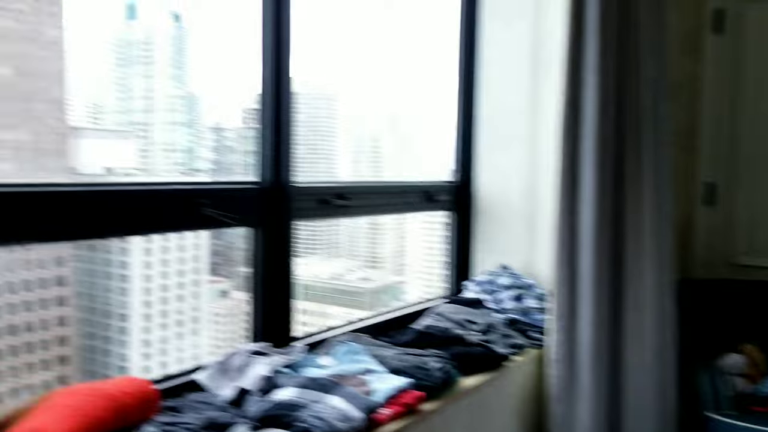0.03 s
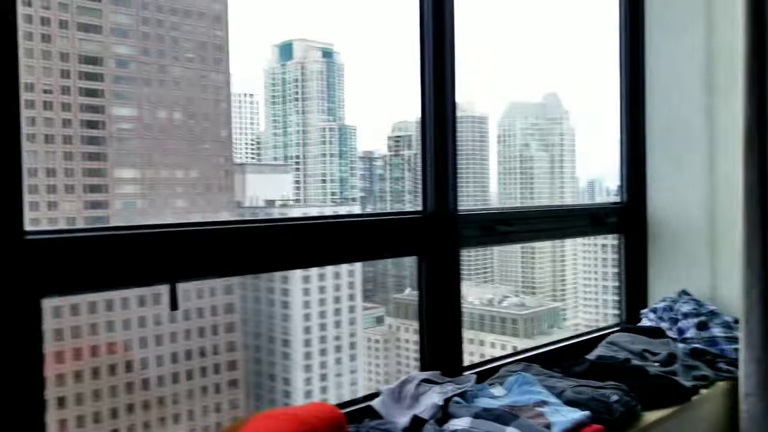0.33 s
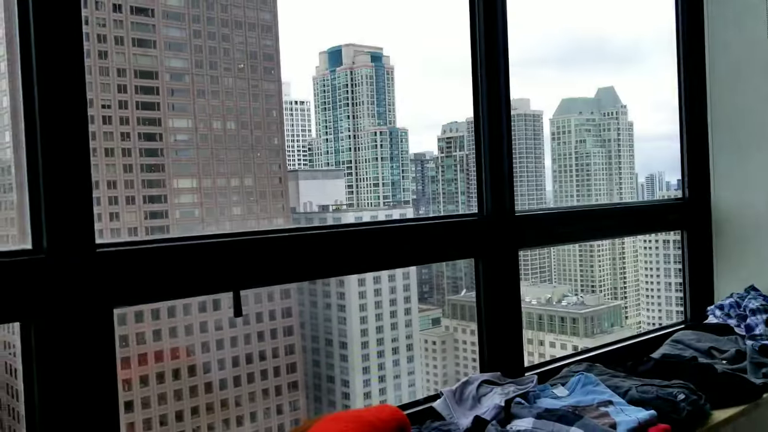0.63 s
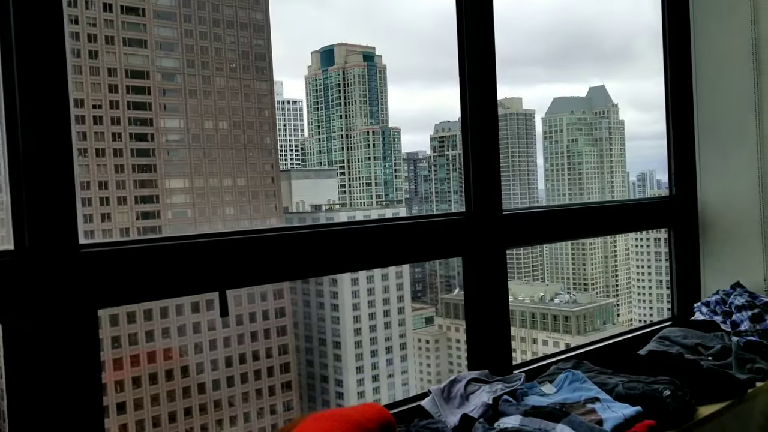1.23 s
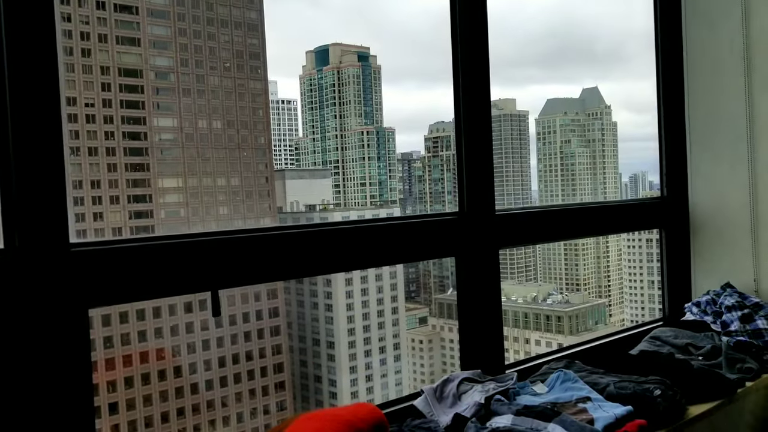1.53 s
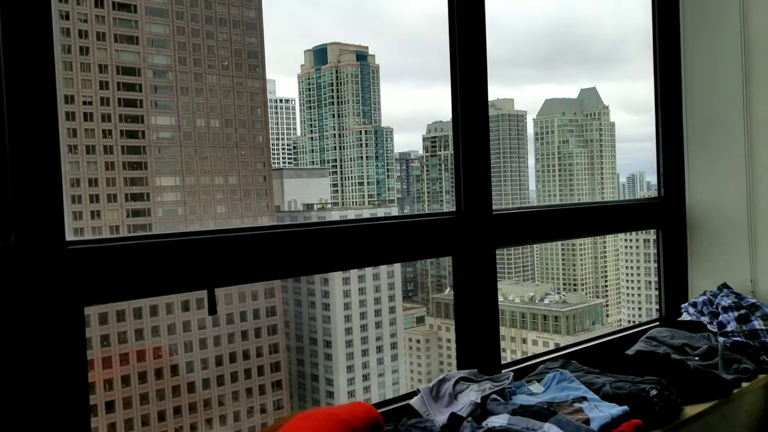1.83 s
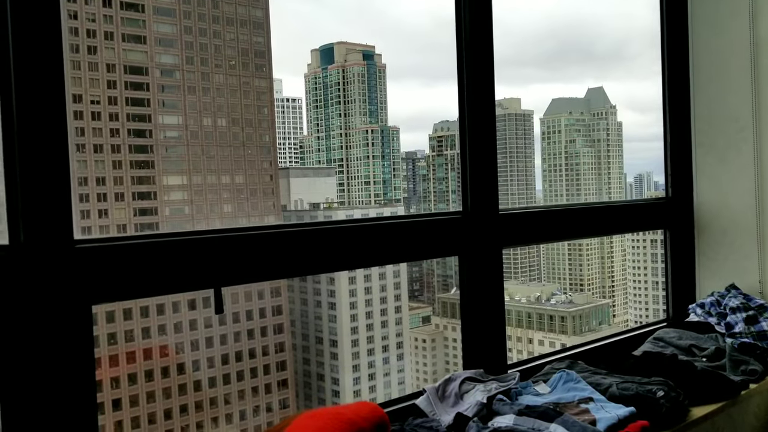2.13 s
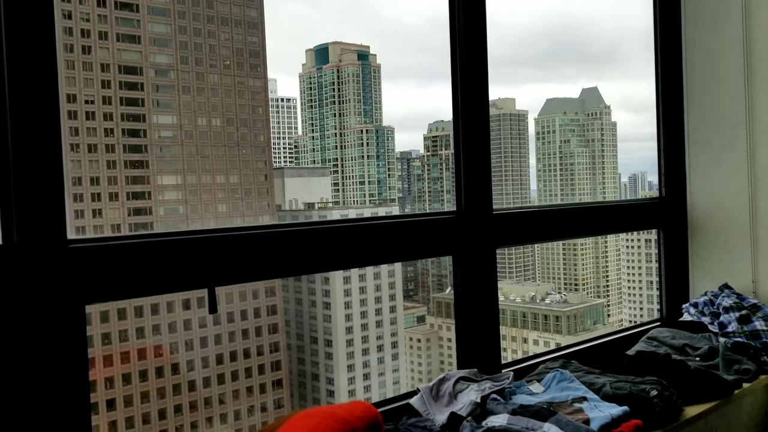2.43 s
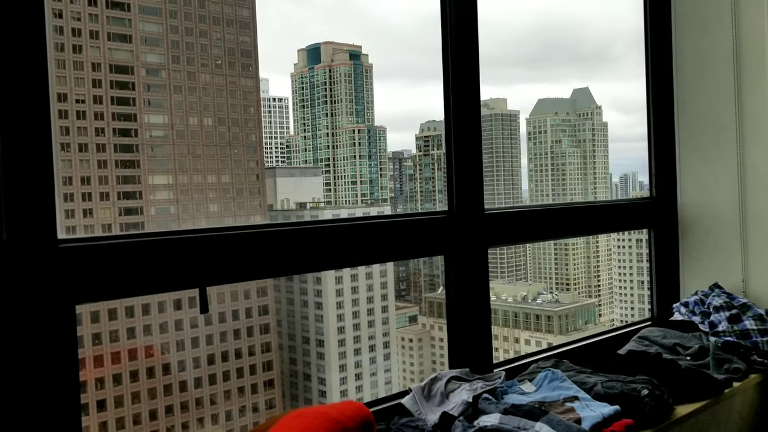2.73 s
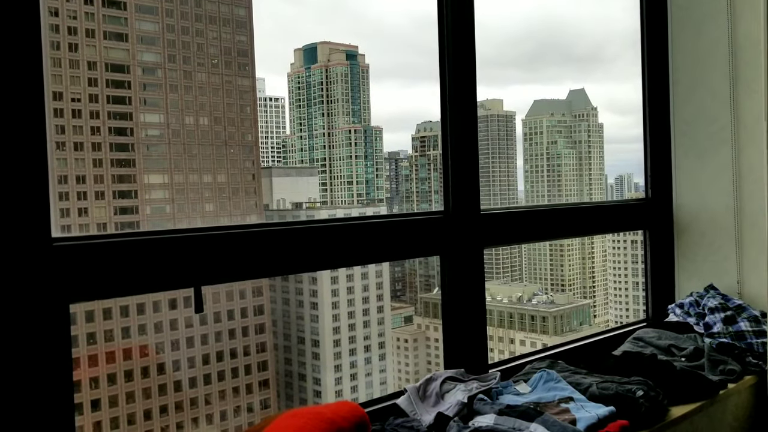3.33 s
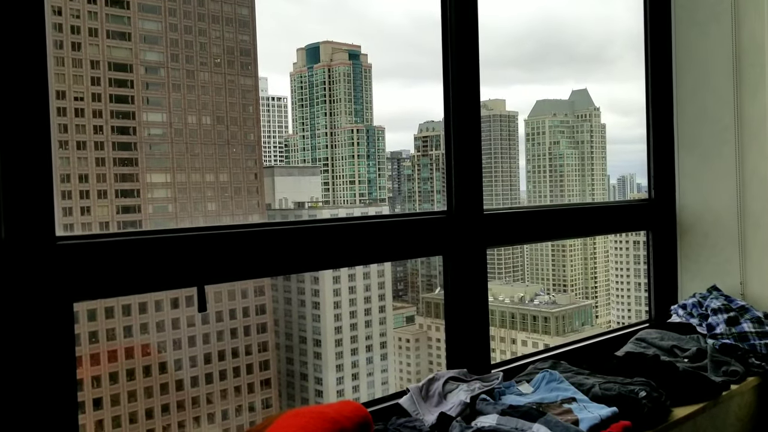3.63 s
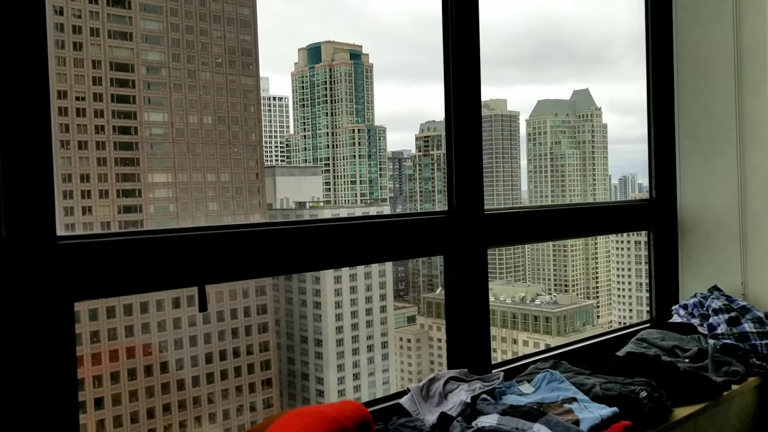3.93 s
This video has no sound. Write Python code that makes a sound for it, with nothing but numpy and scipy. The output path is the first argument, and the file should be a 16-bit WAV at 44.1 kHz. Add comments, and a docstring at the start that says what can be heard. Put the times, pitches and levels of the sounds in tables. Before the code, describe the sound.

Wind rushes dully against the window of a high room, with a thin wavering whistle and a low moan. The whistle gives way to a creak from the frame, which slows to single knocks over faint microphone hiss.

```python
"""A dull rush, a thin whistle and a low moan: wind leans on the window of a high room.
The gap whistles and moans; the pane drones. Under the load the frame sticks and slips,
creaking for two seconds in a run of like slips that slows to single knocks.
The room rings with each slip; a faint hum and microphone hiss lie underneath."""
import sys
import numpy as np
from scipy import signal
from scipy.fft import rfft, irfft
from scipy.io import wavfile
from scipy.ndimage import uniform_filter1d

SR = 44100
rng = np.random.default_rng(int(sys.argv[2]) if len(sys.argv) > 2 else 0)


def transcribe(u):
    """Save the signal u as a 16-bit wav file named by the first command-line argument.

    u: samples, shape (n,) or (channels, n), limited to [-1, 1]; the rate is SR.
    q: integer samples, one column per channel.
    """
    v = np.clip(np.atleast_2d(u).T, -1, 1)
    q = np.round(v * 32767).astype(np.int16)
    wavfile.write(sys.argv[1], SR, q)


N = 176400
T = np.arange(N) / SR

# Wind levels. Each row: time in seconds, level in dB.
RUSH_LEVEL_DB = [(0, -48.5), (.3, -48), (.5, -47), (.56, -50), (1.1, -49), (1.45, -55), (1.72, -46.5),
                 (2.0, -48.5), (2.6, -49), (3.1, -49), (3.55, -50), (4, -49.5)]
MOAN_LEVEL_DB = [(.08, -66), (.28, -57.5), (.38, -48), (.5, -45.5), (.56, -79), (.78, -66), (.87, -46.5),
                 (.93, -64), (1.02, -46.5), (1.11, -61), (1.2, -50.5), (1.3, -56), (1.54, -44),
                 (1.77, -50.5), (1.88, -52.5), (2.0, -61), (2.12, -51), (2.23, -66.5), (2.52, -50),
                 (2.9, -60.5), (3.08, -59), (3.19, -48), (3.3, -61.5), (3.45, -65), (3.63, -46.5),
                 (3.75, -62.5)]
DRONE_LEVEL_DB = [(0, -60.5), (1.0, -62.5), (1.25, -56.5), (1.5, -55), (2.0, -64), (3.3, -71), (3.48, -48),
                  (3.75, -50), (4, -69)]
# Whistle, one list per gust. Each row: time in seconds, pitch in Hz, level in dB.
GUSTS = [
    [(.08, 1830, -60.5), (.125, 1990, -53), (.2, 2070, -57), (.24, 2107, -59.5), (.27, 2035, -54),
     (.31, 2024, -57.5), (.36, 1975, -60), (.41, 1825, -59), (.445, 1868, -53), (.48, 1843, -72),
     (.51, 1872, -57), (.575, 1903, -54.5), (.615, 1917, -55), (.66, 1906, -52), (.75, 1879, -59.5),
     (.82, 1922, -51.5), (.885, 1902, -60.5), (.95, 1922, -51), (1.0, 1860, -62), (1.04, 1867, -60),
     (1.08, 1822, -56), (1.19, 1768, -57.5), (1.23, 1735, -60), (1.4, 1665, -63.5), (1.5, 1685, -61.5),
     (1.53, 1630, -65), (1.59, 1600, -56.5)],
    [(3.89, 1480, -87), (3.95, 1585, -79), (4.0, 1590, -71)],
]

# Pace of the creak. Each row: time in seconds, slips per second.
SLIP_RATE_HZ = [(1.573, 18.89), (1.7, 20.97), (1.98, 24.8), (2.3, 23.2), (2.55, 20.55), (2.8, 16.72),
                (3.0, 12.36), (3.25, 9.36), (3.47, 5.99)]
# Whole slip, then its parts. Each row: time in seconds, gain in dB.
SLIP_GAIN_DB = [(1.573, 2), (1.68, 3.5), (1.95, 2.5), (2.2, 2.25), (2.7, 2.5), (3.11, 2.5), (3.32, 0.5),
                (3.46, 0.5)]
RASP_GAIN_DB = [(1.573, -29), (2.0, -29), (2.6, -26), (3.1, -22), (3.46, -22.5)]
GRIT_GAIN_DB = [(1.573, -57), (1.9, -47), (2.2, -44), (2.7, -38.5), (3.1, -37), (3.46, -43.5)]
PING_GAIN_DB = [(1.573, -8), (1.68, -1), (2.15, -1)]
# Each row: frequency in Hz, gain in dB, T60 in seconds.
FRAME_MODES = [(430.1, -54, 0.32), (569.3, -55.5, 0.27), (594.6, -53, 0.22), (646, -61.5, 0.25),
               (716, -60.5, 0.21), (748.6, -63, 0.32), (848.2, -63, 0.38), (1400, -67.5, 0.28),
               (1495, -74.5, 0.15), (1780, -62, 0.27), (1920, -72, 0.4), (2013, -66.5, 0.4),
               (2305, -57.5, 0.2), (2444, -59.5, 0.18)]
# Each row: frequency in Hz, T60 in seconds.
ROOM_T60_S = [(100, 0.16), (400, 0.24), (800, 0.37), (2000, 0.44), (3000, 0.28), (8000, 0.51)]

# Each row: frequency in Hz, level in dB.
HUM_PARTIALS = [(360, -61.5), (550, -77.5), (824, -80.5), (960, -87.5), (1141, -92)]
# Opening hiss. Each row: time in seconds, level in dB.
EARLY_LEVEL_DB = [(.08, -54), (.2, -58), (.48, -60.5), (.56, -65), (.9, -70), (1.3, -75)]

# Noise spectra. Each row: frequency in Hz, relative density in dB.
RUSH_SPECTRUM = [(12, -30), (24, -12), (33, -6), (55, 3), (90, -3.5), (150, 3.5), (215, -8), (245, 0),
                 (310, -9), (480, -12), (700, -21), (1100, -32.5), (2000, -38.5), (3200, -47),
                 (6000, -55.5), (9000, -81)]
KNOCK_SPECTRUM = [(40, -8), (85, -24), (140, 6), (220, -5), (300, 0), (410, 4), (500, -4), (600, 1),
                  (760, -3), (850, -2), (990, -6.5), (1300, -6.5), (1650, -7), (1980, -5.5), (2200, -7),
                  (2400, -7), (2650, -8), (2980, -13.5), (3300, -20), (4200, -33), (5600, -31.5),
                  (8000, -81), (16000, -82)]
RASP_SPECTRUM = [(1200, -43), (1750, -3.5), (2050, 1.5), (2400, -1.5), (2700, -4.5), (3000, -5.5),
                 (3350, -20), (4500, -65)]
GRIT_SPECTRUM = [(1500, -26), (3000, 9), (3900, 9.5), (5600, 1), (7000, 1.5), (9000, -48), (16000, -35)]
HISS_SPECTRUM = [(1000, -2), (4000, -5.5), (6500, -3.5), (8500, -31), (10000, -3.5), (12000, 6.5),
                 (14500, 5.5)]
EARLY_SPECTRUM = [(150, -4.5), (260, 10.5), (380, 7), (480, 12), (700, 14), (1300, 2), (3000, -1),
                  (6000, -2), (8500, -12), (12500, -2), (14500, -1)]
# Each row: frequency in Hz, left over right in dB.
RUSH_LEFT_DB = [(40, 5), (100, 3), (200, 6.5), (330, 7.5), (530, 11.5), (900, 22.5), (1600, 3), (4700, 1.5),
                (14000, 15)]
# Each row: frequency in Hz, right over left in dB.
SLIP_RIGHT_DB = [(100, 1), (400, -11.5), (800, -9.5), (1200, -12.5), (1500, -11), (2000, -8.5), (2500, -21),
                 (3000, -18.5), (6000, -32.5)]
HISS_RIGHT_DB = [(1000, 7), (5000, -1), (9000, -2.5), (14000, 0)]
EARLY_RIGHT_DB = [(500, -9), (4000, -20.5), (13000, -18)]
# Each row: frequency in Hz, left-right correlation from -1 to 1.
RUSH_CORRELATION = [(40, 0.86), (200, 0.85), (400, 0.83), (900, 0.07), (2500, 0), (8000, 0.2)]
SLIP_CORRELATION = [(100, 0.8), (400, 0.9), (700, 0.42), (1300, -.2), (2500, -.4), (6000, 0)]


def wind(buffet_db=0.2, buffet_hz=7):
    """Buffeting rush outside the glass, with the moan of the gap and the drone of the pane."""
    right_db = [(hz, -db) for hz, db in RUSH_LEFT_DB]
    rush = colour(noise(N), RUSH_SPECTRUM, RUSH_CORRELATION, right_db)
    rush *= amp(curve(RUSH_LEVEL_DB) + buffet_db * wander(buffet_hz))
    moan = tone(hz=189.5, waver=0.01074, rate_hz=7.5) * amp(curve(MOAN_LEVEL_DB) + 1.6 * wander(13))
    drone = tone(hz=87.7, waver=0.042, rate_hz=9) * amp(curve(DRONE_LEVEL_DB) + 3.0 * wander(5.9))
    return rush + panned(moan, right_db=-7.5) + panned(drone, right_db=-6.5)


def whistle(flutter_db=2.5, flutter_hz=45, air_db=-9.5):
    """An edge tone in the gap glides with each gust and flutters inside a skirt of air noise."""
    direct = np.zeros(N)
    for gust in GUSTS:
        times_s, pitch_hz, level_db = np.transpose(gust)
        hz = np.interp(T, times_s, pitch_hz)
        gate = uniform_filter1d(1. * (T > times_s[0]) * (T < times_s[-1]), size=600)
        edge_tone = sum(amp(db) * tone(harmonic * hz, waver=0.00913, rate_hz=85)
                        for harmonic, db in ((1, 0), (2, -35), (3, -39)))
        edge_tone *= amp(flutter_db * wander(flutter_hz))
        air = amp(air_db) * turbulence(0.99 * hz, width_hz=335)
        direct += gate * amp(np.interp(T, times_s, level_db)) * (edge_tone + air)
    room = room_decay(noise(SR // 2), hold_s=0)
    wet = signal.fftconvolve(direct[None], room, axes=1)[:, :N]
    return np.array([direct + amp(-7.5) * wet[0], amp(-12.5) * wet[1]])  # right: room only


def creak(knock_db=-17.5, grit_right_db=-19, spread_db=0.95, fresh_share=0.18, attack_s=0.007):
    """The frame sticks and slips; each slip rings the same modes, but its noise differs a little."""
    rate_hz = curve(SLIP_RATE_HZ) * (T >= SLIP_RATE_HZ[0][0]) * (T < SLIP_RATE_HZ[-1][0])
    slip_count = np.ceil(np.cumsum(rate_hz) / SR)
    t = np.arange(SR // 2) / SR
    ring, ping = frame_ring(t), slip_ping(t)
    attack = 1 - np.exp(-t / attack_s)
    shared = rng.standard_normal((2, 2, len(t)))
    grit = amp([[0], [grit_right_db]]) * room_decay(colour(noise(len(t)), GRIT_SPECTRUM), hold_s=0.056)
    out = np.zeros((2, N))
    for start in np.flatnonzero(np.diff(slip_count, prepend=0) > 0):
        start_s = T[start]
        fresh = rng.standard_normal(shared.shape)
        body, treble = np.sqrt(1 - fresh_share) * shared + np.sqrt(fresh_share) * fresh
        body = colour(body, KNOCK_SPECTRUM, SLIP_CORRELATION, SLIP_RIGHT_DB)
        treble = colour(treble, RASP_SPECTRUM, SLIP_CORRELATION, SLIP_RIGHT_DB)
        knock = amp(knock_db) * room_decay(body, hold_s=0.056)
        rasp = amp(curve(RASP_GAIN_DB, start_s)) * room_decay(treble, hold_s=0.038)
        slip = attack * (knock + ring + rasp + grit * amp(curve(GRIT_GAIN_DB, start_s)))
        slip += ping * amp(curve(PING_GAIN_DB, start_s))
        force = amp(curve(SLIP_GAIN_DB, start_s) + spread_db * rng.standard_normal())
        out[:, start:start + len(t)] += force * slip[:, :N - start]
    return out


def frame_ring(t):
    """Damped modes of the frame, set off by a slip."""
    return sum(panned(amp(db - 60 * t / t60_s) * np.sin(2 * np.pi * hz * t), at_hz(SLIP_RIGHT_DB, hz))
               for hz, db, t60_s in FRAME_MODES)


def slip_ping(t, hz=2352, gain_db=-52.5, peak_s=0.0056):
    """Short ping at the start of a slip."""
    envelope = amp(gain_db) * (t / peak_s * np.exp(1 - t / peak_s)) ** 2
    return panned(envelope * np.sin(2 * np.pi * hz * t), at_hz(SLIP_RIGHT_DB, hz))


def room_decay(pair, hold_s):
    """Holds, then each band fades at the room's rate; the left has energy 1."""
    hz, t, bands = signal.stft(pair, SR, nperseg=256)
    fade = amp(-60 * np.maximum(t - hold_s, 0) / at_hz(ROOM_T60_S, hz)[:, None])
    tail = signal.istft(bands * fade, SR, nperseg=256)[1]
    return tail[:, :pair.shape[1]] / np.linalg.norm(tail[0])


def hum(flicker_db=1.54, flicker_hz=6.1):
    """Faint partials, wavering in pitch and level."""
    partials = sum(amp(db) * tone(hz, waver=0.0066, rate_hz=19.8) * amp(flicker_db * wander(flicker_hz))
                   for hz, db in HUM_PARTIALS)
    return panned(partials, right_db=-8.0)


def hiss(steady_db=-71.5):
    """Steady microphone hiss, plus a louder opening hiss that fades."""
    steady = amp(steady_db) * colour(noise(N), HISS_SPECTRUM, right_db=HISS_RIGHT_DB)
    early = amp(curve(EARLY_LEVEL_DB)) * colour(noise(N), EARLY_SPECTRUM, right_db=EARLY_RIGHT_DB)
    return steady + early


def turbulence(hz, width_hz):
    """Turbulence in a resonance: a tone of random strength and phase."""
    phase = 2 * np.pi * np.cumsum(hz) / SR
    return unit_rms(wander(width_hz / 2) * np.cos(phase) + wander(width_hz / 2) * np.sin(phase))


def tone(hz, waver, rate_hz):
    """Sine of rms 1; its pitch wanders by the fraction `waver`."""
    pitch_hz = hz * (1 + waver * wander(rate_hz))
    return unit_rms(np.sin(2 * np.pi * np.cumsum(pitch_hz) / SR))


def wander(rate_hz):
    """Low-passed noise of rms 1."""
    hz = np.fft.rfftfreq(N, 1 / SR)
    return unit_rms(irfft(rfft(rng.standard_normal(N)) / (1 + (hz / rate_hz) ** 4), N))


def colour(pair, spectrum, correlation=((1, 0), (2, 0)), right_db=((1, 0), (2, 0))):
    """Sets spectrum, correlation and balance of two noises; the left has rms 1."""
    size = pair.shape[1]
    hz = np.fft.rfftfreq(size, 1 / SR)
    left, other = rfft(pair)
    likeness = at_hz(correlation, hz)
    right = (likeness * left + np.sqrt(1 - likeness ** 2) * other) * amp(at_hz(right_db, hz))
    out = irfft(np.array([left, right]) * amp(at_hz(spectrum, hz)), size)
    return out / out[0].std()


def noise(size):
    """Stereo white noise."""
    return rng.standard_normal((2, size))


def panned(x, right_db):
    """Mono to stereo, with a gain on the right."""
    return np.array([x, x * amp(right_db)])


def curve(rows, t=T):
    """Interpolates rows over time."""
    return np.interp(t, *np.transpose(rows))


def at_hz(rows, hz):
    """Interpolates rows over log frequency."""
    row_hz, values = np.transpose(rows)
    return np.interp(np.log(hz + 1), np.log(row_hz + 1), values)


def amp(db):
    """Decibels to gain."""
    return 10 ** (np.asarray(db) / 20)


def unit_rms(x):
    """Scales to rms 1."""
    return x / np.sqrt(np.mean(x ** 2) + 1e-20)


def scene():
    """Wind, whistle and creak in a quiet room."""
    return wind() + whistle() + creak() + hum() + hiss()


def record(dry, open_s=0.078, fade_s=0.0024, cutoff_hz=14600):
    """The microphone opens just after the start; a low-pass limits the band."""
    opened = dry * np.clip((T - open_s) / fade_s, 0, 1)
    lowpass = signal.firwin(511, cutoff_hz, window=("kaiser", 9), fs=SR)
    return signal.oaconvolve(opened, lowpass[None], "same")


dry = scene()
out = record(dry)
transcribe(out)
```